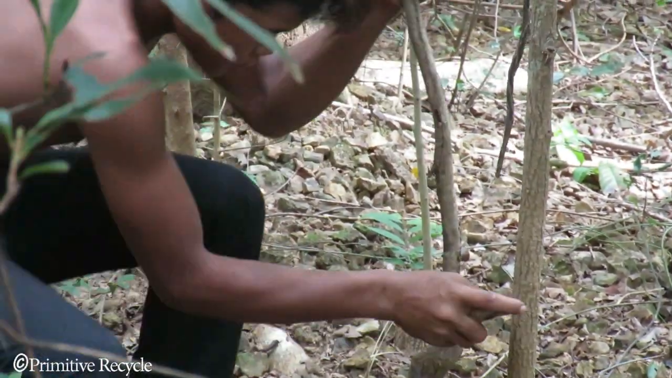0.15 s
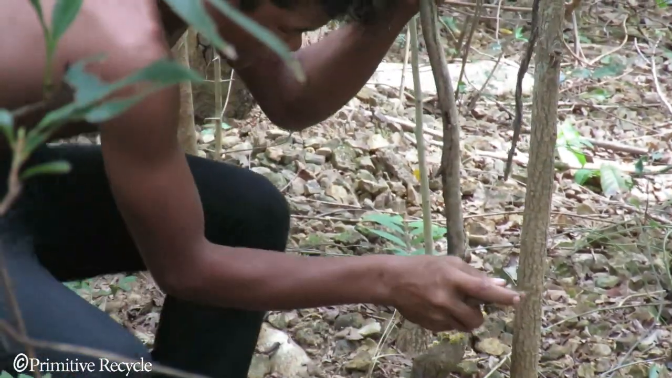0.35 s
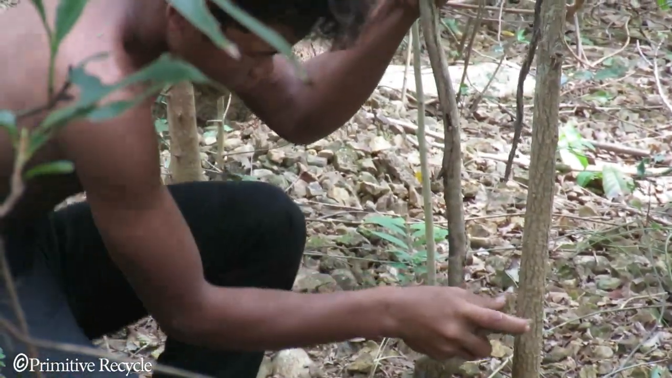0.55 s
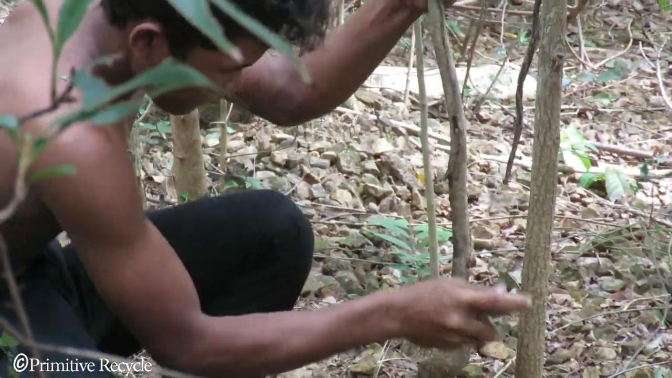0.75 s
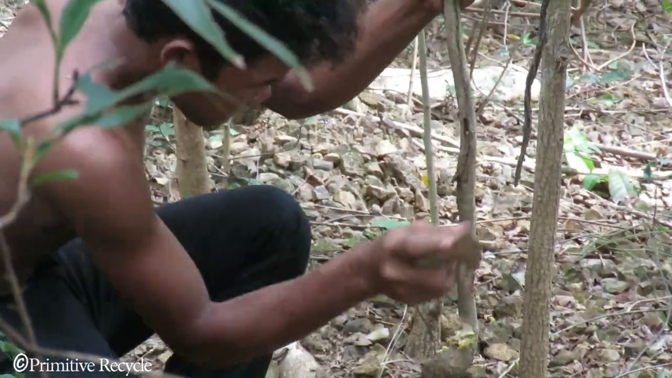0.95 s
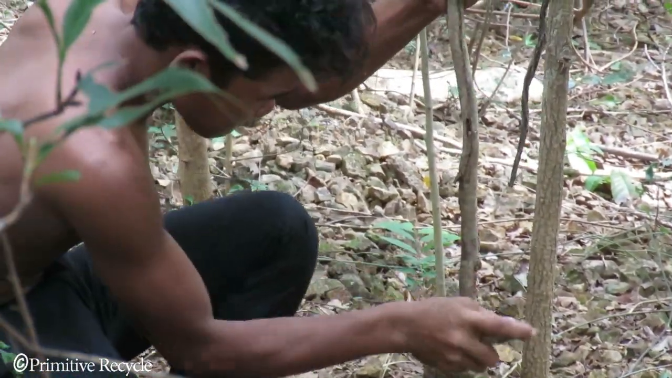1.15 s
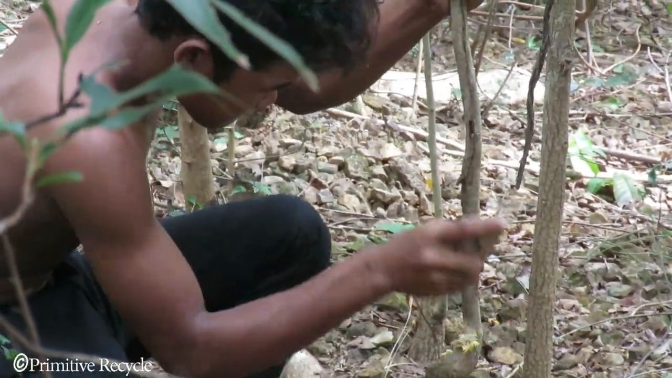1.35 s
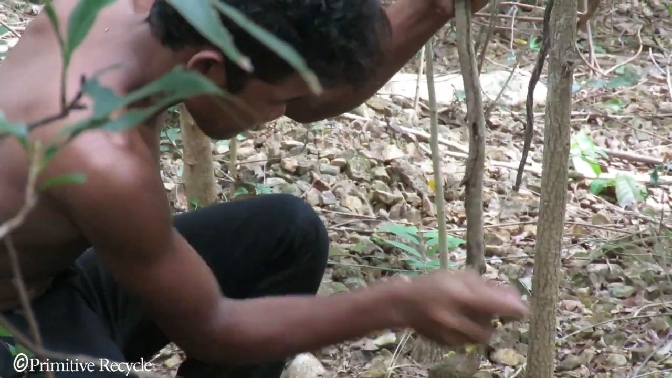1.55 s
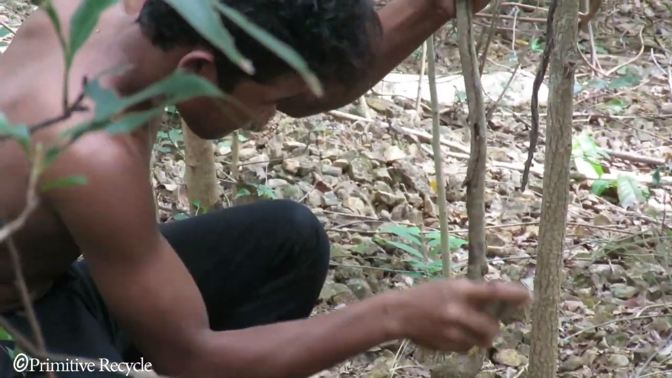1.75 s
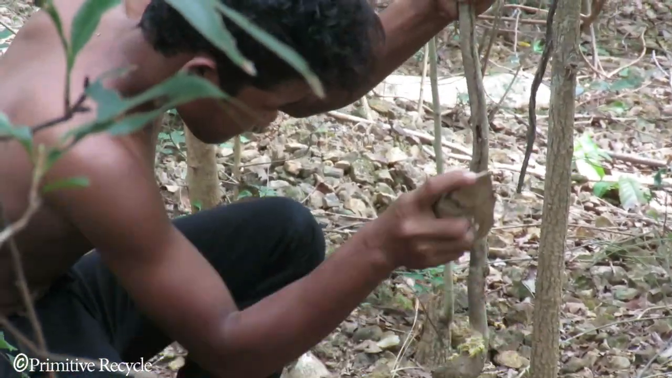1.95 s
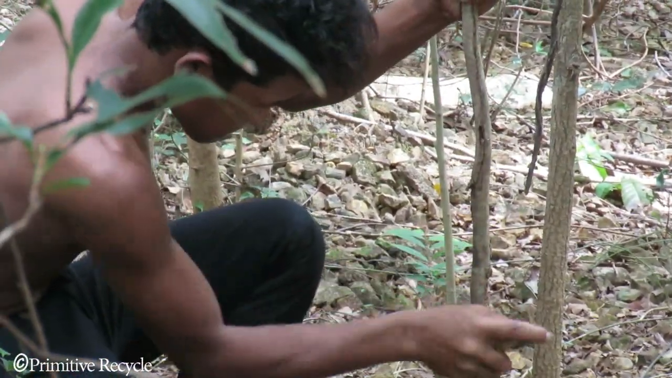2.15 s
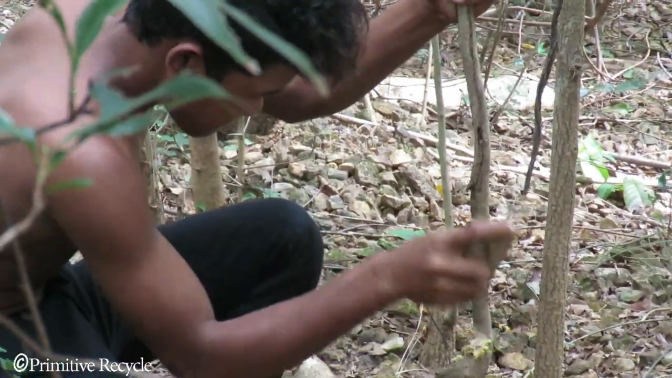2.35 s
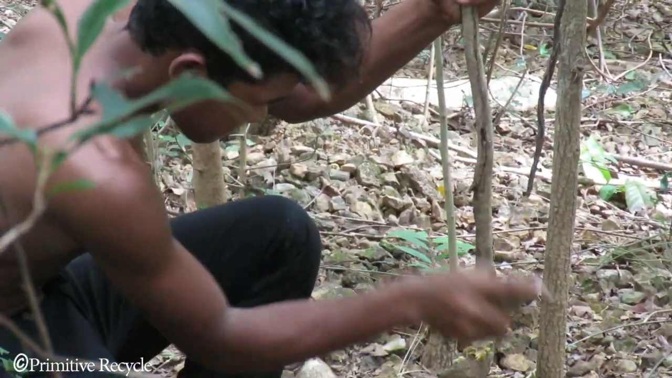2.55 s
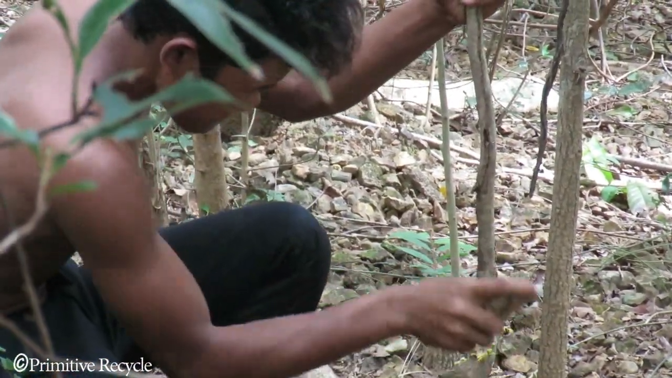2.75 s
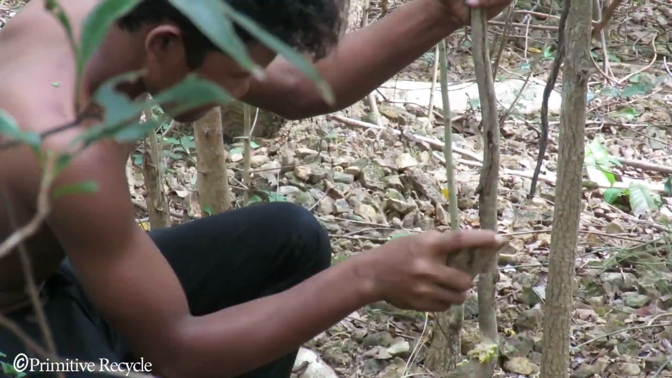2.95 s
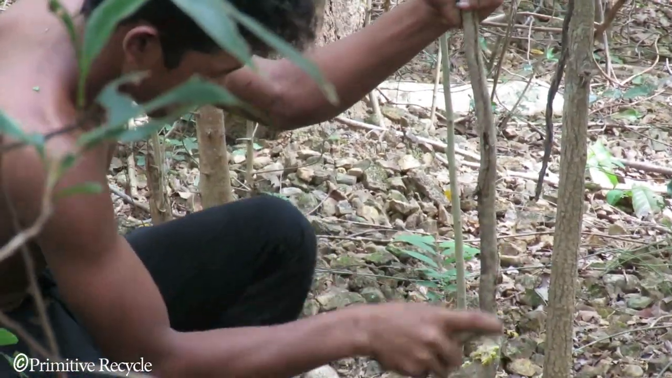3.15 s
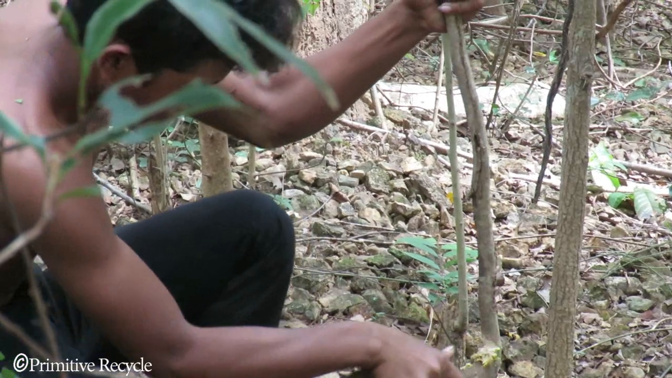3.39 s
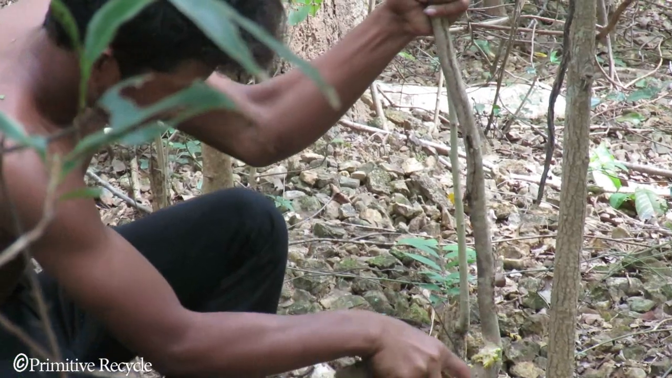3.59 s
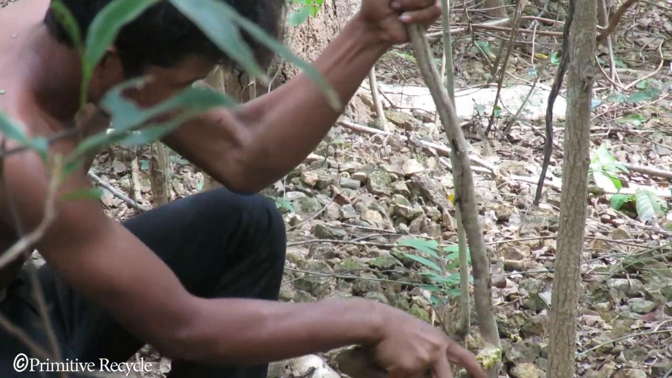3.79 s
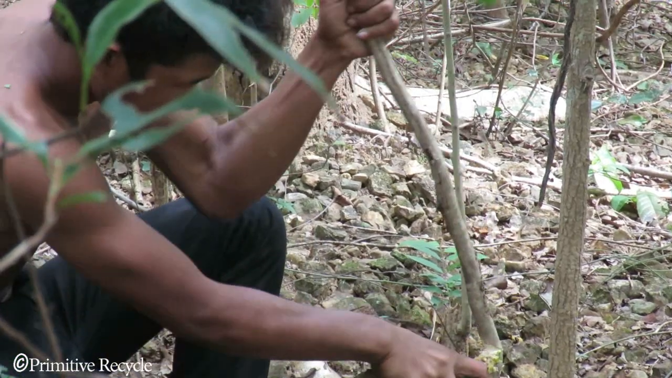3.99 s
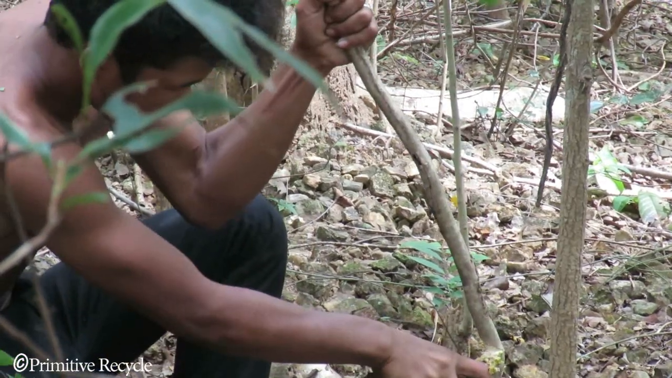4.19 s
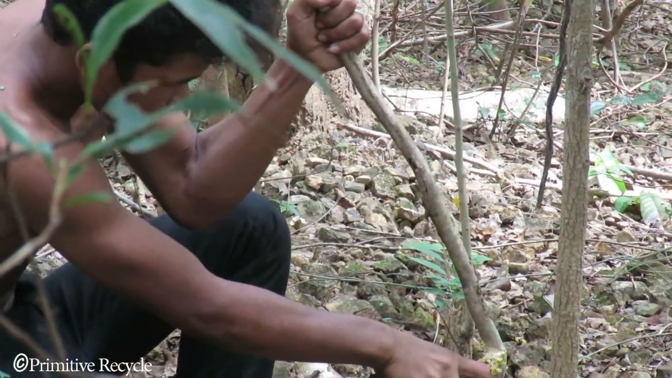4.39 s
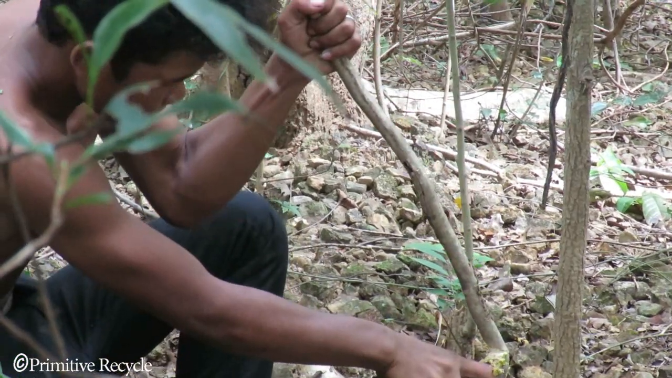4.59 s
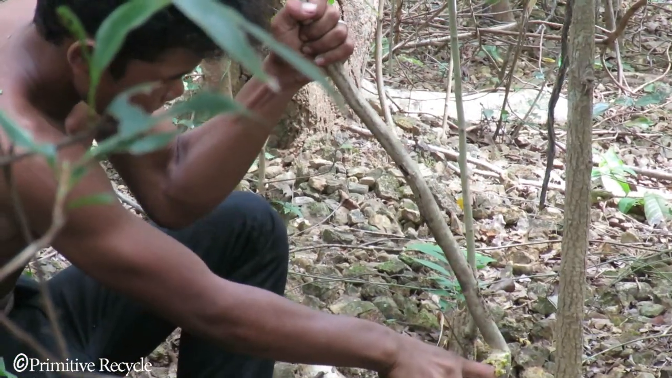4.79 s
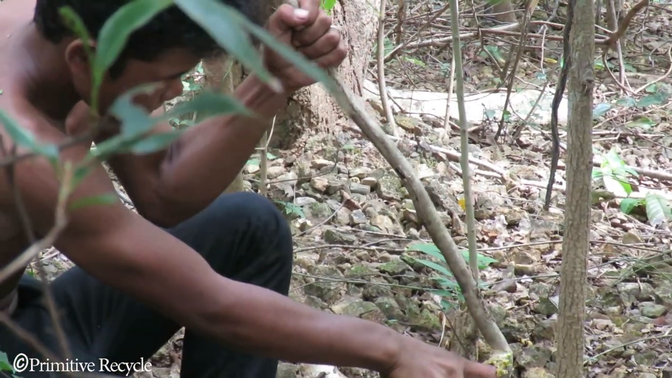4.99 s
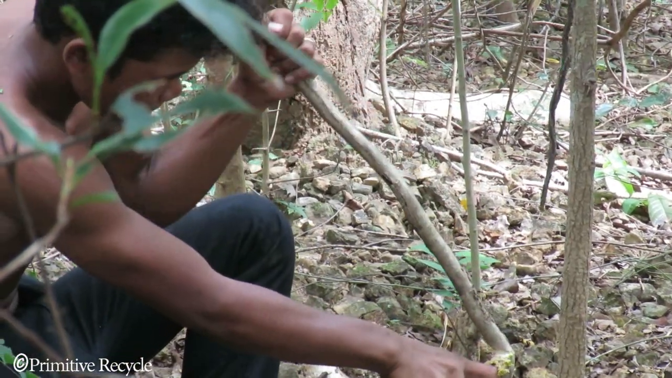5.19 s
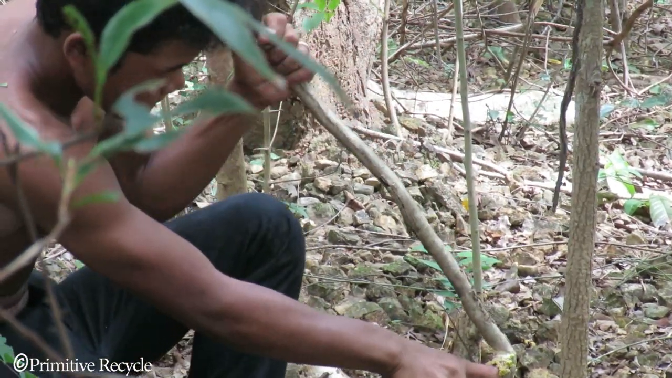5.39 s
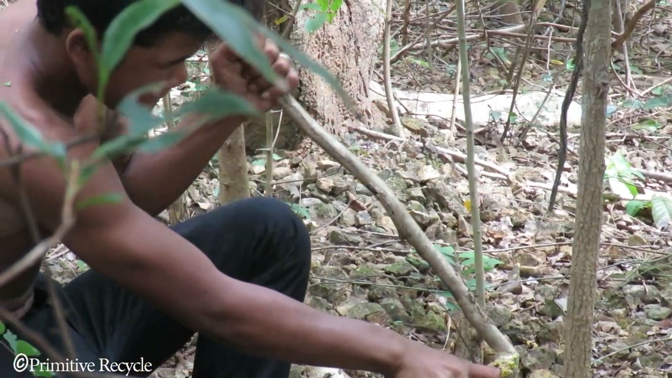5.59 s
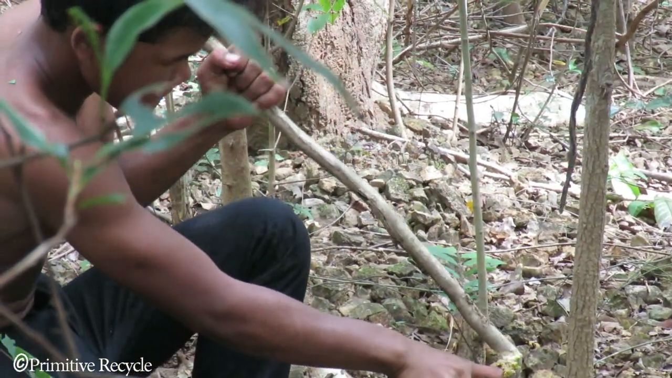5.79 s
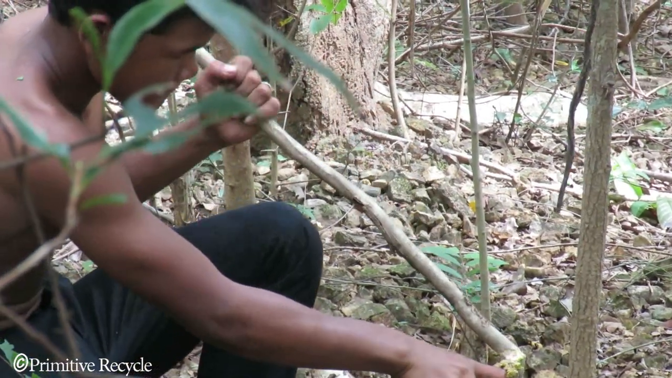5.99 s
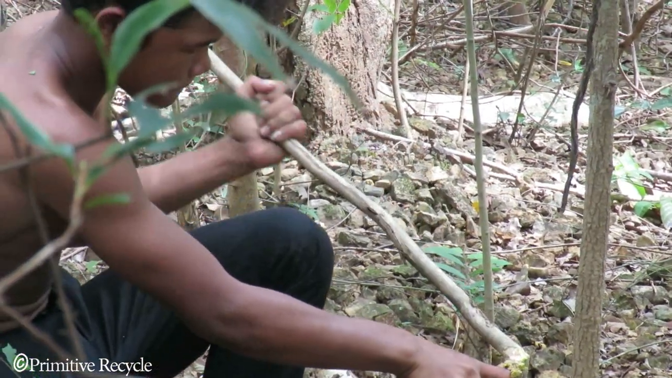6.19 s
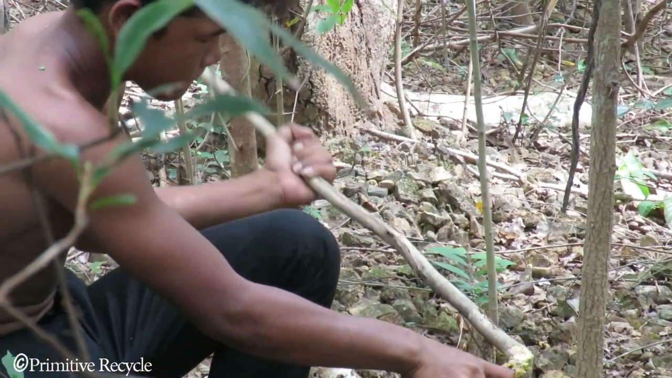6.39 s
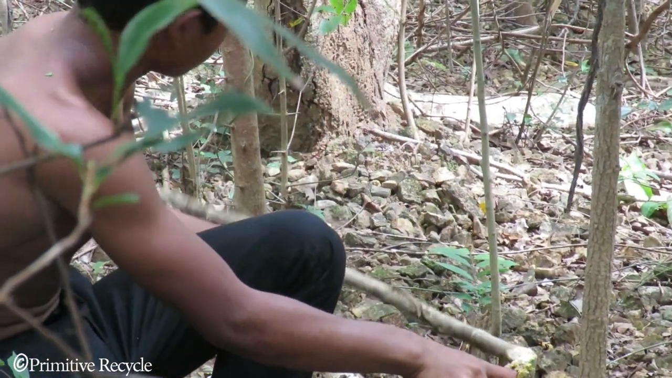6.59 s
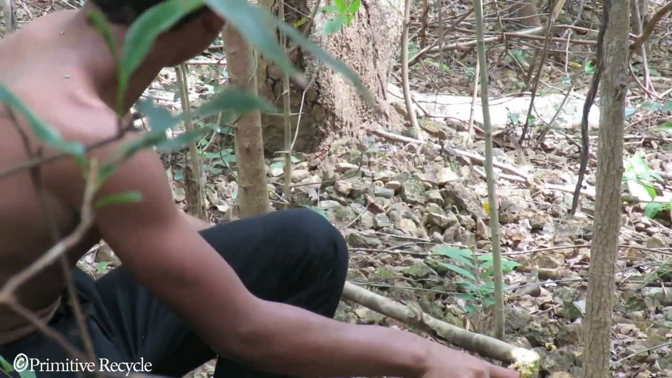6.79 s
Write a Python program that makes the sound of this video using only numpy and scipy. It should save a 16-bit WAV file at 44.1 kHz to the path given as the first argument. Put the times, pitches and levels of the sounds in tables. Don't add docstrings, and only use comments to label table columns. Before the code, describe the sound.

Close by in a quiet forest with faint far rumble, leaves brush and a stone taps a thin stem twice, the second firmer. Four sharp, woody chops follow at half-second spacing, with stony click, splinters and brief tree scatter. After a pause of tiny ticks, the stem is bent: leaves swish, fibres crack and tear increasingly densely, one snap loudest, then soft thuds and bark scrapes.

```python
import sys
import numpy as np
from scipy import signal
from scipy.fft import rfft, irfft, next_fast_len
from scipy.io import wavfile
from scipy.ndimage import uniform_filter1d, map_coordinates

SR = 44100
rng = np.random.default_rng(int(sys.argv[2]) if len(sys.argv) > 2 else 0)


def unload_audio(sound):
    columns = np.transpose(np.atleast_2d(sound))
    steps = np.round(np.clip(columns, -1, 1) * 32767)
    wavfile.write(sys.argv[1], SR, steps.astype(np.int16))


def invert_db(level):
    return 10 ** (np.asarray(level, dtype=float) / 20)


N = 301644

# t/s, level/dB
FAR_LEVEL = [(0, -50), (1.15, -50), (1.45, -53), (2.4, -50.5), (3.1, -54), (6.84, -51.5)]
# f/Hz, density/dB per Hz
RUMBLE_SPECTRUM = [(15, -56), (25, -22), (54, -6), (108, -1), (188, -9), (216, -7.5), (273, -15),
                   (400, -14), (520, -77), (880, -120)]
# f/Hz, density/dB per Hz
AIR_SPECTRUM = [(120, -41), (200, 1.5), (491, 1.5), (612, -25), (777, -6), (968, -7.5), (4770, -20.5),
                (12200, -32), (16000, -44)]
# f/Hz, width/Hz, level/dB
HUM_BANDS = [(484.5, 71, -1), (738.4, 87, 0.5), (1030, 79, -5.5)]
# f/Hz, correlation
FAR_LIKENESS = [(60, 1), (130, 0.9), (290, -0.95), (640, 0.13), (1410, -0.33), (3100, -0.26), (6820, 0.1),
                (15000, 0.28)]
# f/Hz, correlation
NEAR_LIKENESS = [(60, 0.85), (150, 1), (380, 0.81), (950, 0.72), (2380, 0.99), (5980, 0.92), (15000, 0.22)]
# t/s, level/dB
BRUSHING = [(0.0, -48), (0.15, -54), (0.35, -49.5), (0.62, -60), (1.16, -59.5), (1.45, -67.5), (2.99, -65),
            (3.31, -66.5), (3.87, -57), (4.08, -48.5), (4.36, -57), (4.84, -58), (5.1, -54), (5.45, -59),
            (5.75, -51.5), (6.1, -54), (6.6, -62), (6.84, -56)]
# f/Hz, density/dB per Hz
LEAF_SPECTRUM = [(150, -11.5), (250, 2.5), (748, -6), (1080, -3), (2280, -9), (4900, -10), (13400, -22.5),
                 (14900, -25), (16000, -47)]
# start t/s, length/s, level/dB, low band over it/dB
RUB_STROKES = [
    (0.274, 0.075, -54.5, 13.5),
    (0.328, .09, -48.5, 1),
    (6.583, .03, -55, -2),
    (6.612, 0.11, -49.5, 7.5),
    (6.75, .07, -44.5, -1),
    (6.806, .07, -51, -1),
]
# f/Hz, width/Hz, level/dB
BARK_BANDS = [(1490, 78, -6), (2000, 260, 0), (4030, 160, -8.5)]
# f/Hz, width/Hz, level/dB
HOLLOW_BAND = [(632, 88, 0)]
# t/s, peak level/dB, f/Hz
STEM_KNOCKS = [(4.345, -43, 720), (4.62, -38, 550), (4.869, -41, 513), (5.29, -41, 503), (5.619, -41, 482),
               (5.694, -36.5, 575), (5.947, -31, 1290), (5.949, -40, 830), (5.959, -37.5, 263),
               (6.365, -47, 253), (6.451, -39, 360), (6.679, -42, 630), (6.684, -37, 200)]
# t/s, peak level/dB
CROWN_THUDS = [
    (6.274, -48),
    (6.327, -44),
    (6.364, -42.5),
    (6.555, -49),
    (6.584, -44),
]
# t/s, peak level/dB, f/Hz, t60/s
SQUEAKS = [
    (2.0864, -38.5, 1710, 0.016),
    (4.1816, -41.5, 1590, 0.029),
    (5.139, -43, 1600, 0.11),
]
# t/s, peak level/dB, centre f/Hz, treble level/dB
FIBRE_SNAPS = [(0.2154, -35, 802, -11), (2.4494, -41, 875, -23), (3.0348, -37.5, 945, -17.5),
               (3.3234, -42, 1520, -16), (3.3503, -40, 3950, -7), (3.5873, -42, 1030, -18),
               (3.941, -34, 1670, -11), (4.5231, -20, 2620, -7), (4.588, -30.5, 2070, -11),
               (4.605, -31.5, 2510, -5), (4.8704, -20.5, 2540, -8), (4.9477, -30, 1020, -16),
               (5.1841, -17.5, 5450, -16), (5.5533, -21.5, 2530, -9), (5.694, -12, 3520, -7.5),
               (5.7793, -23.5, 2620, -10.5), (5.8536, -35, 3030, -20), (5.9484, -23, 918, -14.5),
               (6.1285, -27.5, 2550, -5), (6.5765, -39.5, 1900, -6), (6.6483, -42, 2070, -4.5)]
# t/s, peak level/dB, centre f/Hz, treble level/dB
DRY_TICKS = [(1.488, -58, 810, -1), (3.5269, -41, 1600, -10), (3.6476, -38.5, 991, -10),
             (3.9914, -28, 1100, -27), (4.0427, -33, 1080, -31), (4.4548, -32, 3100, -12),
             (4.7536, -30, 1780, -14.5), (4.818, -38, 3950, -12), (4.8404, -25.5, 1050, -6),
             (5.2051, -25, 1990, -12.5), (5.3587, -36, 834, -9.5), (5.479, -31, 1880, -16),
             (5.6526, -27.5, 2510, -9.5), (5.7509, -27.5, 3070, -1), (6.0417, -27, 2120, -9),
             (6.1569, -25, 2600, -6.5), (6.348, -32.5, 1470, -21), (6.6274, -34, 2000, -15)]
# t/s, peak level/dB, centre f/Hz, treble level/dB
SLOW_TEARS = [(2.979, -36.5, 3000, -22), (3.8936, -34.5, 3920, -6), (4.1824, -32, 1560, -9),
              (5.0484, -40, 3990, -6), (5.0809, -30, 1030, -21), (5.252, -35, 3970, -8),
              (5.267, -26, 4130, -10.5), (5.288, -25.5, 4900, -12), (5.5044, -32.5, 2550, -7),
              (5.6, -27, 2170, -7.5), (5.612, -26.5, 2580, -8.5), (5.8884, -21.5, 2760, -8),
              (5.8935, -23, 2560, -10), (6.0232, -27, 2480, -10), (6.4518, -36, 848, -31),
              (6.771, -29, 1910, -11)]
# f/Hz, density/dB per Hz
FIBRE_SPECTRUM = [(180, -34), (300, -5), (565, -3.5), (1390, -11), (1870, -5), (3830, -5.5), (4300, -4.5),
                  (6410, -8.5), (12500, -11), (16000, -22.5)]
# f/Hz, t60/s
SCATTER_DECAY = [(100, 0.9), (300, 0.29), (700, 0.22), (1500, 0.75), (2200, 0.27), (3000, 0.59),
                 (4600, 0.58), (7000, 0.64), (12000, 0.39)]
# f/Hz, density/dB per Hz
SCATTER_SPECTRUM = [(60, -43), (150, 10.5), (400, -1), (1000, -6), (1500, -16.5), (2200, -6), (3300, -19),
                    (4600, -14.5), (7000, -26.5), (10000, -24.5), (15000, -34)]
# t/s, level/dB, hardness/dB per octave
AIMING_TAPS = [
    (0.165, -28.5, -8),
    (0.5448, -19.5, -2.5),
]
# f/Hz, level/dB, t60/s
GRIPPED_MODES = [(188, -7, 0.054), (261, 4, 0.037), (360, -1, 0.038), (480, -2.5, 0.038),
                 (630, -10.5, 0.078), (800, -13, 0.06), (1080, -11, 0.034), (2380, -14, 0.035)]
# t/s, level/dB, ring length factor, splinter level/dB, scatter level/dB
CHOPS = [
    (1.1924, -14, 0.62, -8, -5.5),
    (1.721, -15.5, 0.79, -5.5, -8),
    (2.2354, -14.5, 0.82, 1, -5.5),
    (2.7189, -15, 0.82, -3, -7),
]
# f/Hz, level/dB for chops 1 to 4
STEM_MODES = [(136.4, -16, -11, -12.5, -10.5), (190, -7, -4.5, -5, -8), (219.7, -4.5, -3, -8, -4.5),
              (259, -2.5, -0.5, -1.5, -3.5), (312, 1, 0, -5, -3), (372.6, 6, 5, -0.5, 3.5),
              (623, 2, 3, -8, -5), (720, -19, 2.5, -2, 0), (833, -8.5, -33, -7, -1),
              (1030, -17, 0.5, -8, 2.5), (1129, 8, 4, 5, 3.5), (1470, -3.5, -23, 3, -8),
              (1690, -39, -12, -38, -0.5), (2000, -5, 0, 3.5, 7)]
# f/Hz, level/dB for chops 1 to 4
STONE_MODES = [(2340, 1, -3, -3.5, 5), (3310, -15, -10, -10, -11), (4050, -14, -12, -36, -2),
               (4310, -42, -15.5, -8, -7), (4730, -30, -32, -16, -10), (5450, -17, -25, -39, -9.5),
               (6350, -38, -27, -35, -16)]
# f/Hz, t60/s
MODE_DECAY = [(126, 0.33), (186, 0.17), (385, 0.063), (620, .05), (1100, 0.031), (2000, 0.025),
              (3200, 0.016), (4500, 0.018)]


def unit(x):
    return x / np.sqrt(np.mean(x ** 2) + 1e-20)


def along(points, hz):
    f, v = np.transpose(points)
    return np.interp(np.log(hz + 1), np.log(f + 1), v)


def curves(rows):
    s, *columns = np.transpose(rows)
    return [np.interp(np.arange(N) / SR, s, column) for column in columns]


def wobble(rate):
    knots = rng.standard_normal(int(N * rate / SR) + 4)
    return map_coordinates(knots, [np.arange(N) * rate / SR])


def filtered(x, response):
    n = x.shape[-1]
    m = next_fast_len(n + 4096)
    return irfft(rfft(x, m) * response(np.fft.rfftfreq(m, 1 / SR)), m)[..., :n]


def resonances(modes):
    def response(f):
        total = 0
        for k, (centre, width, db) in enumerate(modes):
            damping = 1j * f * width
            total = total + (-1) ** k * invert_db(db) * damping / (centre * centre - f * f + damping)
        return total
    return response


def pair(shape, likeness):
    def mid_and_side(f):
        turn = np.arccos(np.clip(along(likeness, f), -1, 1)) / 2
        return np.array([np.cos(turn), np.sin(turn)])
    mid, side = filtered(shape * rng.standard_normal((2, len(shape))), mid_and_side)
    return np.array([mid + side, mid - side])


def add(out, s, x):
    part = out[..., round(s * SR):][..., :x.shape[-1]]
    part += x[..., :part.shape[-1]]


def stroke(u):
    return np.sin(np.pi / 2 * np.interp(u, [0, 0.53, 1], [0, 1, 0])) ** 1.06


def random_patches(shape, bands, frames):
    field = uniform_filter1d(rng.standard_normal(shape), size=bands, axis=0)
    return unit(uniform_filter1d(field, size=frames, axis=1))


def patchy(x, depth_db):
    z = signal.stft(x, nperseg=512)[2]
    gain = invert_db(depth_db * random_patches(z.shape[1:], 7, 6))
    return signal.istft(z * gain, nperseg=512)[1][:, :x.shape[1]]


def thin(f):
    return (1j * f / (80 + 1j * f)) ** 4


def forest():
    rumble = filtered(pair(invert_db(1.35 * wobble(24)), FAR_LIKENESS), lambda f: invert_db(along(RUMBLE_SPECTRUM, f)))
    hum = filtered(pair(invert_db(0.7 * wobble(4)), FAR_LIKENESS), lambda f: resonances(HUM_BANDS)(f) ** 2)
    air = filtered(pair(np.ones(N), FAR_LIKENESS), lambda f: invert_db(along(AIR_SPECTRUM, f)))
    return invert_db(curves(FAR_LEVEL)[0]) * unit(rumble) + invert_db(-55) * unit(hum) + invert_db(-53.5) * unit(air)


def rustle():
    swish_db, = curves(BRUSHING)
    harder_db = swish_db + 58.5
    torn = np.clip((np.arange(N) / SR - 5) * 10, 0, 1)
    treble_db = -1.5 + 0.34 * harder_db + 3.5 * torn
    bass_db = -1.16 - 0.43 * harder_db
    grain = unit(invert_db(2.5 * wobble(900) + wobble(70) + wobble(9) / 2))
    contacts = patchy(pair(grain, NEAR_LIKENESS), depth_db=1.7)
    noise = filtered(contacts, lambda f: invert_db(along(LEAF_SPECTRUM, f)))
    low = filtered(noise, lambda f: 1 / (1 + (f / 1200) ** 4))
    high = filtered(noise, lambda f: 1 - 1 / (1 + (f / 6500) ** 4))
    body = noise - low - high
    return invert_db(swish_db) * (body + invert_db(bass_db) * low + invert_db(treble_db) * high) / body.std()


def rub():
    slips = pair(invert_db(3.5 * wobble(400) + 1.9 * wobble(50.01)), NEAR_LIKENESS)
    upper = unit(filtered(slips, resonances(BARK_BANDS)))
    lower = unit(filtered(slips, resonances(HOLLOW_BAND)))
    out, t = np.zeros((2, N)), np.arange(N) / SR
    for s, length, db, low_db in RUB_STROKES:
        out += invert_db(db) * stroke((t - s) / length) * (upper + invert_db(low_db - 5.5) * lower)
    return out


def knocks():
    out, t = np.zeros(N), np.arange(SR // 8) / SR
    hits = [(s, db, hz, 183, 0.1) for s, db, hz in STEM_KNOCKS]  # width/Hz, t60/s
    hits += [(s, db, 96, 70, 0.06) for s, db in CROWN_THUDS]  # f/Hz, width/Hz, t60/s
    for s, db, hz, width_hz, t60 in hits:
        force = invert_db(-60 * t / t60) * rng.standard_normal(len(t)) + 6 * invert_db(-60 * t / 0.0017)
        puff = filtered(force, resonances([(hz, width_hz, 0)]))
        add(out, s, invert_db(db + 2.5) * puff / np.abs(puff).max())
    return out


def squeaks():
    out, t = np.zeros(N), np.arange(SR // 8) / SR
    for s, db, hz, t60 in SQUEAKS:
        envelope = invert_db(db + 4.5 - 60 * t / t60) * (1 - np.exp(-t / 0.0014))
        add(out, s, envelope * np.sin(2 * np.pi * hz * t + 1.5 * np.sin(500 * t)))
    return out


def fibre_colour(hz, treble_db):
    def response(f):
        treble = (treble_db + 11) * np.clip(np.log2(f / 4000 + 1e-9), 0, 1.2)
        peak = 1.3 / (1 + ((f - hz) / 400) ** 2)
        overtone = 0.29 / (1 + ((f - 1.88 * hz) / 600) ** 2)
        return invert_db(along(FIBRE_SPECTRUM, f) + treble) * (1 + peak + overtone)
    return response


def snaps():
    out, t = np.zeros((2, N)), np.arange(SR // 6) / SR
    kinds = [(FIBRE_SNAPS, 0.0006, 0.03, 8),  # rise/s, t60/s, crack over the burst/dB
             (DRY_TICKS, 0.0006, 0.035, 13),
             (SLOW_TEARS, 0.004, 0.099, -10)]
    for rows, rise_s, t60, crack_db in kinds:
        for s, db, hz, treble_db in rows:
            ragged = invert_db(3.5 * rng.standard_normal(len(t) // 40 + 1).repeat(40)[:len(t)])
            fall = invert_db(-60 * t / t60) + invert_db(-7.5 - 60 * t / 0.26)
            burst = ragged * fall * (1 - np.exp(-t / rise_s))
            crack = invert_db(crack_db - 60 * t / 0.002)
            noise = pair(burst + crack, NEAR_LIKENESS)
            add(out, s, invert_db(db - 7.5) * filtered(noise, fibre_colour(hz, treble_db)))
    return out


def hillside():
    low = resonances([(113, 130, 0)])
    noise = rng.standard_normal(SR // 2)
    return unit(filtered(noise, lambda f: low(f) ** 2)) * stroke(np.arange(SR // 2) / SR / 0.069)


def trees(bright_db, length):
    hz, t, z = signal.stft(pair(np.ones(SR // 2), NEAR_LIKENESS), SR, nperseg=256)
    t60 = length * along(SCATTER_DECAY, hz)[:, None]
    fall = invert_db(9 - 60 * t / (0.3 * t60)) + invert_db(2 - 60 * t / t60)
    patch_db = 1.8 * random_patches(z.shape[1:], 5, 5)
    colour_db = along(SCATTER_SPECTRUM, hz) + bright_db * np.log2(1 + hz / 500)
    tail = signal.istft(z * fall * invert_db(colour_db[:, None] + patch_db), SR, nperseg=256)[1][:, :SR // 2]
    onset = 1 - np.exp(-np.arange(SR // 2) / 150)
    return filtered(tail * onset, thin)


def ground(blow):
    return invert_db(-15) * filtered(blow, lambda f: (1j * f / (1240 + 1j * f)) ** 2)


def shiver():
    t = np.arange(SR // 2) / SR
    high = resonances([(2130, 440, 0)])
    noise = pair(invert_db(4 * wobble(40.4)[:len(t)]), NEAR_LIKENESS)
    return invert_db(-60 * t / 0.57) * unit(filtered(noise, lambda f: high(f) ** 2))


def splinters(db):
    burst = pair(invert_db(db - 60 * np.arange(SR // 2) / SR / 0.06), NEAR_LIKENESS)
    return filtered(burst, lambda f: invert_db(along(FIBRE_SPECTRUM, f)) / (1 + (f / 9100) ** 3))


def rings(hz, db, t60):
    luck = rng.standard_normal((2, len(hz), 1))
    late = np.maximum(np.arange(SR // 2) / SR - 0.01 / np.sqrt(hz), 0)
    detune = 1 + 0.008 * luck[0]
    swing = np.sin(2 * np.pi * hz * detune * late) * (1 - np.exp(-late * hz * 6))
    fall = invert_db(-60 * late / t60) + invert_db(-1.5 - 60 * late / (0.5 * t60))
    ring = invert_db(db) * fall * swing
    lean_db = 420 / (hz + 150) + 0.5 * luck[1]
    left, right = (ring * invert_db(lean_db)).sum(0), (ring * invert_db(-lean_db)).sum(0)
    return filtered(np.array([left, right]), thin)


def taps():
    out = np.zeros((2, N))
    hz, level, t60 = np.transpose(GRIPPED_MODES)[:, :, None]
    for s, db, hard_db in AIMING_TAPS:
        knock = rings(hz, level + hard_db * np.log2(hz / 260), t60)
        add(out, s, invert_db(db) * (knock + invert_db(-12) * trees(hard_db / 2, 0.94)))
    return out


def chops():
    out = np.zeros((2, N))
    hz, *levels = np.transpose(list(STEM_MODES) + list(STONE_MODES))[:, :, None]
    for (s, db, length, chip_db, scatter_db), level in zip(CHOPS, levels):
        blow = invert_db(db) * (rings(hz, level, along(MODE_DECAY, hz) * length) + splinters(chip_db))
        add(out, s, blow)
        add(out, s + 0.0084, ground(blow))
        longer = length - 1
        add(out, s + 0.0036, invert_db(db + scatter_db) * trees(1.25 + 9.5 * longer, 1 + 0.91 * longer))
        top_mode_db = level[len(STEM_MODES) - 1]
        add(out, s, invert_db(db + top_mode_db - 35.5) * shiver())
        add(out, s + 0.06, invert_db(db - 29.5) * hillside())
    return out


def scene():
    return forest() + rustle() + rub() + knocks() + squeaks() + snaps() + taps() + chops()


def band_limit(x):
    return signal.sosfilt(signal.butter(12, 16470, fs=SR, output="sos"), x)


def record(dry):
    limited = dry / (1 + np.abs(dry / 0.93) ** 8) ** (1 / 8)

    def microphone(f):
        bass_cut = 1j * f / (40 + 1j * f)
        return bass_cut * (f < 16400) / (1 + (f / 15200) ** 40)
    return band_limit(filtered(limited, microphone))


dry = scene()
out = record(dry)
unload_audio(out)
```